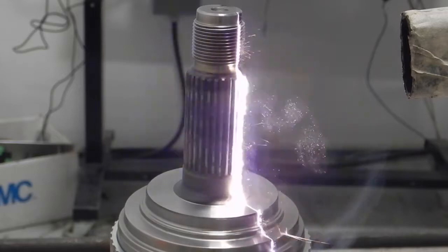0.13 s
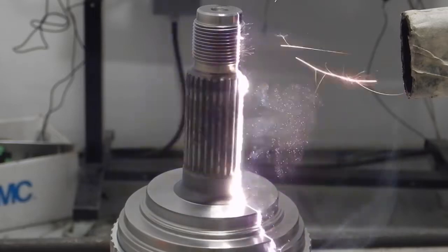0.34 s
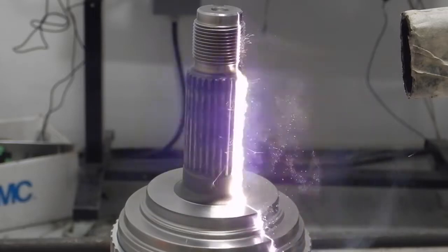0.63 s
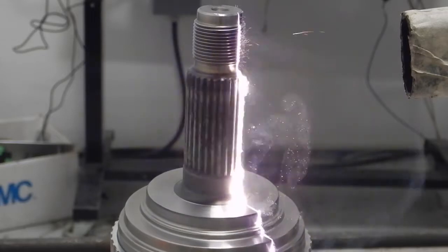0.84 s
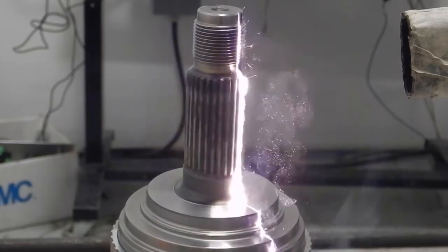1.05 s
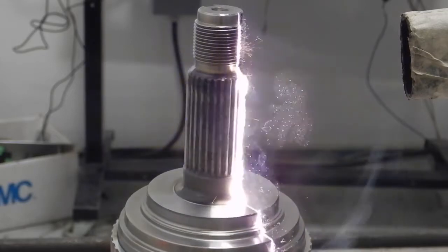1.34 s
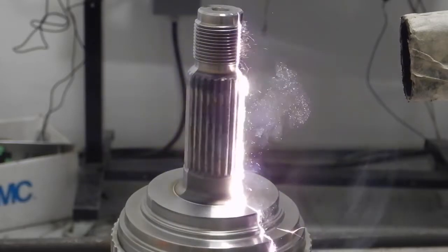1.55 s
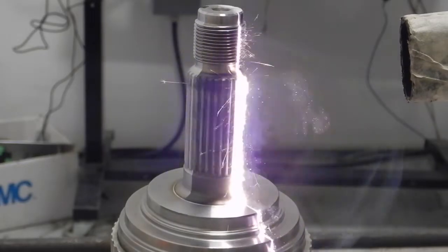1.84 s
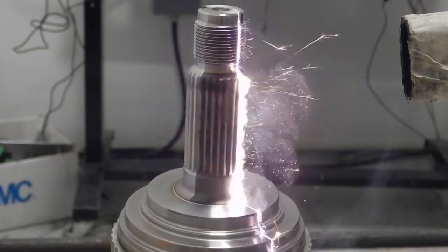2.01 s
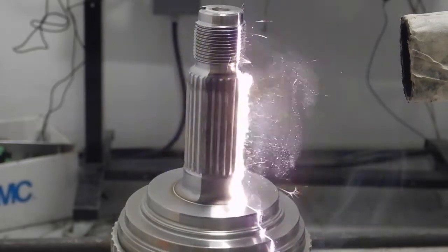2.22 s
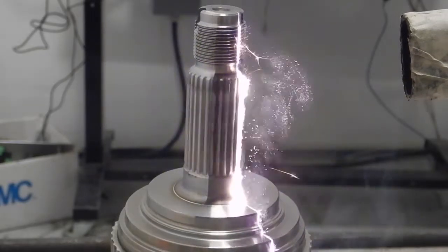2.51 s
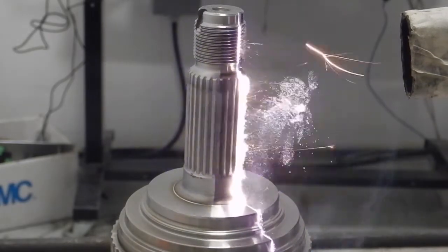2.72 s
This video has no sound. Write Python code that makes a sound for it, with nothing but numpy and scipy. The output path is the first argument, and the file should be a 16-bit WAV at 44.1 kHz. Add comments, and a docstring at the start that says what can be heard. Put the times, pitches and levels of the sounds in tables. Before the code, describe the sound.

A laser scanning a splined steel shaft gives a loud, continuous, harsh buzzing rasp, bright and metallic, with brief spark flares; a low hum pulses about four times a second over extraction rumble and hiss, close in a workshop.

```python
"""A harsh, bright rasp: a laser line scans a splined steel shaft about 160 times a second in a workshop.
Each sweep is a row of clicks at the shoulders of the part over filtered noise that swells on the splines,
with short metallic tones, flaring sparks, a narrow gliding whistle and a noise-tail room. Sines locked to the
sweep make the scanner hum, a buzz on the left that swells, knocks softly and stops four times a second, and a
blip after it. Behind all this an extraction fan rumbles and hisses as coloured noise."""
import sys
import numpy as np
from scipy import signal
from scipy.fft import rfft, irfft, next_fast_len
from scipy.io import wavfile
from scipy.ndimage import uniform_filter1d, map_coordinates

SR = 44100
rng = np.random.default_rng(int(sys.argv[2]) if len(sys.argv) > 2 else 0)


def ratio(d):
    """dB to gain"""
    e = np.asarray(d, float) / 20
    return 10 ** e


def store_wav(level_fs):
    """Save 16-bit WAV to argv[1]."""
    pcm = np.round(np.clip(np.atleast_2d(level_fs), -1, 1) * 32767)
    wavfile.write(sys.argv[1], SR, pcm.T.astype(np.int16))


N = 126126  # length in samples


def level(x, db):
    """Scale to an rms level in dB."""
    return x * ratio(db) / np.sqrt(np.mean(x ** 2))


def colour(x, points):
    """Zero-phase equaliser through (f/Hz, level/dB) points, so pulses stay symmetric."""
    hz, db = np.array(points).T
    size = next_fast_len(N + 4096)
    bins_hz = np.arange(size // 2 + 1) * SR / size
    gain_db = np.interp(np.log(bins_hz + 1), np.log(hz), db)
    return irfft(rfft(x, size) * ratio(gain_db), size)[:N]


def walk(rate):
    """Random levels, rate of them a second, smoothed twice; mean 0, spread 1."""
    hold = int(SR / rate)
    steps = np.repeat(rng.standard_normal(N // hold + 1), hold)
    smooth = uniform_filter1d(uniform_filter1d(steps, hold), hold)[:N]
    return (smooth - smooth.mean()) / smooth.std()


def clicks(at_s, size):
    """Band-limited clicks (windowed sincs) placed between samples."""
    at = at_s * SR
    tap = np.floor(at).astype(int)[:, None] + np.arange(-7, 9)
    off = tap - at[:, None]
    pulse = size[:, None] * np.sinc(off) * np.cos(np.pi * off / 16) ** 2
    inside = (tap >= 0) & (tap < N)
    out = np.zeros(N)
    np.add.at(out, tap[inside], pulse[inside])
    return out


BUZZ_EVERY_S, BUZZ_END_S = .2421, 0.2502  # repeat time, and one moment at which the buzz stops
BLIP_AFTER_S, BLIP_S = 0.045, 0.014  # delay after the buzz stops, half-width of the bell


def flash(t):
    """Short Gaussian bell soon after each buzz stops."""
    late = (t - BUZZ_END_S - BLIP_AFTER_S + BUZZ_EVERY_S / 2) % BUZZ_EVERY_S - BUZZ_EVERY_S / 2
    return np.exp(-(late / BLIP_S) ** 2)


SWEEP_HZ, SWEEP_START_S = 160.45, -.00342
SWEEP_JITTER_MS, STUMBLE_MS = 0.037, 0.081  # timing scatter always, and extra during a blip
# How late the sweep runs against a steady clock: t/s, lag/ms
SWEEP_DRIFT = [(0.013, 0.12), (0.118, -0.21), (0.162, -0.25), (0.23, -0.67), (0.448, -1.21), (0.51, -1.09),
               (0.56, -0.88), (0.641, -0.86), (0.697, -1.01), (0.803, -1.02), (0.852, -1.38),
               (0.983, -1.35), (1.171, -1.14), (1.27, -1.24), (1.376, -1.0), (1.414, -0.8), (1.47, -0.91),
               (1.564, -0.79), (1.607, -1.04), (1.694, -1.24), (1.738, -1.1), (1.812, -1.29),
               (1.943, -1.11), (1.987, -1.47), (2.062, -1.27), (2.168, -1.26), (2.311, -1.02),
               (2.348, -1.21), (2.411, -1.08), (2.473, -1.28), (2.592, -0.94), (2.66, -1.13),
               (2.741, -0.95), (2.847, -1.12)]


def sweeps(t):
    """Running count of sweeps: a steady rate with slow drift and random jitter."""
    s, ms = np.array(SWEEP_DRIFT).T
    spread = SWEEP_JITTER_MS + STUMBLE_MS * flash(t)
    lag_s = (np.interp(t, s, ms) + spread * walk(110)) / 1000
    return (t - SWEEP_START_S - lag_s) * SWEEP_HZ


FAN_DB, FAN_LEFT_DB = -39, 3  # rms before panning; left over right
FAN_APART = 0.19  # gain of the rumble that is opposite in the two channels
AIR_DB, AIR_LEFT_DB = -36, 3
# Tone of the fan rumble: f/Hz, level/dB
FAN_COLOUR = [(25, -27), (80, -13.5), (120, -7), (165, -1.5), (210, 0.5), (260, -3.5), (330, -4.5),
              (400, -17), (550, -20.5), (800, -17), (1000, -17), (2000, -30)]
# Tone of the air hiss: f/Hz, level/dB
AIR_COLOUR = [(20, 0), (60, -3.5), (400, 0), (600, -2.5), (1000, -2.5), (1300, -3.5), (2000, -6),
              (3500, -14.5), (5400, 4), (7600, -31), (10000, -6), (12800, 3.5), (14000, -2), (14500, -50)]


def extraction():
    """Fan rumble, mostly alike left and right, and separate air noise per side with shared gusts."""
    side = np.array([[1], [-1]])
    mid, apart = (colour(rng.standard_normal(N) * ratio(0.98 * walk(8.87)), FAN_COLOUR) for _ in range(2))
    rumble = level(mid + FAN_APART * side * apart, FAN_DB)
    gust_db = 2.5 * walk(9.05)
    air = np.array([colour(rng.standard_normal(N) * ratio(gust_db + 2.0 * walk(14)), AIR_COLOUR)
                    for _ in range(2)])
    return rumble * ratio(side * FAN_LEFT_DB / 2) + level(air, AIR_DB) * ratio(side * AIR_LEFT_DB / 2)


# Gain of the extraction's lower middle, which thins out at times: t/s, level/dB
LOWER_MIDDLE = [(0.0, 1.5), (1.03, 1.5), (1.07, -4.5), (1.34, -6), (1.38, -0.5), (2.18, 1), (2.23, -6),
                (2.38, -3), (2.45, -1), (2.52, -5), (2.65, 0), (2.86, -1)]


def thin(x, t):
    """Turn the 380-1080 Hz part up and down."""
    band = signal.butter(3, [380, 1080], "band", fs=SR, output="sos")
    part = signal.sosfiltfilt(band, x)
    return x + part * (ratio(np.interp(t, *np.array(LOWER_MIDDLE).T)) - 1)


ROOM_DB, ROOM_T60_S = -22.5, 0.24


def room(x, t):
    """Diffuse workshop tail: decaying noise after a 4 ms gap, different in each channel."""
    lag = t[:SR // 2]
    tails = rng.standard_normal((2, len(lag))) * ratio(-60 * lag / ROOM_T60_S) * (lag > .004)
    return np.array([signal.fftconvolve(x, level(tail, ROOM_DB) / np.sqrt(len(tail)))[:N] for tail in tails])


# Partials of the scanner hum: multiple of the sweep rate, left level/dB, right level/dB, waver/dB
SCANNER_HUM = [(1.0, -53, -63, 3), (2.0, -41.5, -44, -0.1), (3.0, -56.5, -58.5, 3.5), (4.0, -57, -61.5, 5),
               (5.0, -60, -61, 5)]


def scanner(turn):
    """Hum of sines at multiples of the sweep rate, each wavering in level."""
    hum = 0
    for multiple, left, right, waver_db in SCANNER_HUM:
        gain = np.sqrt(2) * ratio(np.array([[left], [right]]) + waver_db * walk(14))
        hum = hum + gain * np.sin(2 * np.pi * round(multiple) * turn)
    return hum


BLIP_RIGHT_DB = -1  # right against left
# Partials of the blip at full bell: multiple of the sweep rate, level/dB
BLIP_PARTIALS = [(3.0, -47), (4.0, -47), (5.0, -43), (6.0, -48.5), (13.0, -52)]


def blip(t, turn):
    """Upper partials of the sweep flash briefly, nearly in the middle."""
    tone = 0
    for multiple, db in BLIP_PARTIALS:
        gain = np.sqrt(2) * ratio(db + 3.2 * walk(4.87))
        tone = tone + gain * np.cos(2 * np.pi * round(multiple) * turn)
    return tone * flash(t) * ratio(np.array([[0], [BLIP_RIGHT_DB]]))


BUZZ_LENGTH_S, BUZZ_RIGHT_DB = 0.106, -25  # right against left
SURGE_DB, SURGE_S = 12, 0.013  # SURGE_S is both the lead before the stop and the half-width
KNOCK_DB, KNOCK_S = -35, 0.0044  # typical peak, half-width
# Partials of the buzz before its surge: multiple of the sweep rate, level/dB
BUZZ_PARTIALS = [(1.0, -54.5), (2.0, -44), (3.0, -60), (4.0, -53), (5.0, -63)]


def buzz(t, turn):
    """Gated sweep partials that set in, surge with a low knock (one smooth pulse) and stop."""
    # negative before the stop, positive after it
    past_end = (t - BUZZ_END_S + BUZZ_EVERY_S * .75) % BUZZ_EVERY_S - BUZZ_EVERY_S * .75
    gate = (np.tanh((past_end + BUZZ_LENGTH_S) / 0.0036) - np.tanh(past_end / 0.0037)) / 2
    surge = np.exp(-((past_end + SURGE_S) / SURGE_S) ** 2)
    tone = 0
    for multiple, db in BUZZ_PARTIALS:
        gain = np.sqrt(2) * ratio(db + 1.8 * walk(39.95))
        tone = tone + gain * np.sin(2 * np.pi * round(multiple) * turn)
    knock = -ratio(KNOCK_DB + 1.5 * walk(3.8)) * np.exp(-((past_end + SURGE_S) / KNOCK_S) ** 2)
    return (tone * gate * ratio(SURGE_DB * surge) + knock) * ratio(np.array([[0], [BUZZ_RIGHT_DB]]))


SPLINE_EDGE_MS = 0.076  # softness of each edge
# Stretches of a sweep on the splines: from t/ms, to t/ms, extra level/dB
SPLINE_STRETCHES = [(.75, 2.3, 4), (3.4, 4.55, 6.5)]


def splines(turn):
    """Extra dB while the beam is on the splines."""
    ms = turn % 1 * 1000 / SWEEP_HZ
    return sum(db / 2 * (np.tanh((ms - start) / SPLINE_EDGE_MS) - np.tanh((ms - end) / SPLINE_EDGE_MS))
               for start, end, db in SPLINE_STRETCHES)


FLARE_DB, FLARE_S = -17.5, 0.013  # offset on the table's levels; delay to the peak and half-width
FLARE_WIDTH = .11  # half-bandwidth as a share of the pitch
FLARE_GATE = 1.36  # how deeply the splines chop the flare, times their dB
# Sparks that flare: onset t/s, level/dB of the burn at its peak then (FLARE_DB is added), f/Hz
SPARKS = [(0.28, -16, 3330), (0.372, -17, 3400), (0.6194, -15, 3740), (0.765, -17, 3800),
          (1.005, -17, 3620), (1.2491, -11, 4000), (1.492, -16, 4440), (1.9674, -10.5, 4570),
          (2.2094, -12, 4600), (2.4594, -13, 4650), (2.5494, -13.5, 3600), (2.705, -15, 4600)]


def flares(t, turn):
    """Sparks: short bells of band-passed noise around one pitch, loudest on the splines."""
    out = 0
    for s, db, hz in SPARKS:
        band = signal.butter(2, [hz * (1 - FLARE_WIDTH), hz * (1 + FLARE_WIDTH)], "band", fs=SR, output="sos")
        noise = level(signal.sosfilt(band, rng.standard_normal(N)), db + FLARE_DB)
        bell = np.exp(-((t - s) / FLARE_S - 1) ** 2)
        out = out + noise * bell * ratio(FLARE_GATE * splines(turn))
    return out


# Short decaying tones that colour the clicks and the sizzle: f/Hz, level/dB, t60/s
CLICK_TONES = [(1244, -30, 0.005), (3073, -37, 0.017), (3980, -26, 0.0038), (4650, -29.5, 0.011),
               (6140, -35, 0.0096), (8200, -30.5, 0.0091)]


def metallic(x, t):
    """The sound plus its convolution with short decaying tones, for a metallic colour."""
    lag = t[:SR // 20]
    tones = sum(ratio(db - 60 * lag / t60) * np.cos(2 * np.pi * hz * lag) for hz, db, t60 in CLICK_TONES)
    return x + signal.fftconvolve(x, tones)[:N]


CRACK_JITTER_MS, CRACK_SCATTER_DB, CRACK_DRIFT_DB = 0.018, 1.54, 1.17
# Shoulders crossed in one sweep, up and down again: t/ms, push +1 or pull -1, relative level/dB
SHOULDER_CRACKS = [(.935, -1, -8), (2.01, -1, 1), (2.907, -1, -11), (3.44, 1, -1), (3.54, -1, -2.6),
                   (4.527, -1, -4.5), (5.50, -1, -11.5)]
# Tone of the cracks: f/Hz, level/dB
CRACK_COLOUR = [(700, -51), (980, -30), (1100, -7.5), (1750, -6), (1950, 0), (3000, -3.5), (4600, -2),
                (6100, -1.5), (7000, -9), (9000, -13.5), (13000, -15.5), (14300, -48)]


def cracks(t, turn):
    """A metallic coloured click at each shoulder, a little different on every sweep."""
    count = np.arange(int(turn[-1]) + 1)
    start = np.interp(count, turn, t)
    sample = np.clip(start * SR, 0, N - 1).astype(int)
    when, size = [], []
    for ms, sign, db in SHOULDER_CRACKS:
        jitter_ms = CRACK_JITTER_MS * walk(7.12)[sample]
        scatter_db = CRACK_SCATTER_DB * rng.standard_normal(len(count))
        drift_db = CRACK_DRIFT_DB * walk(9.1)[sample]
        when.append(start + (ms + jitter_ms) / 1000)
        size.append(np.sign(sign) * ratio(db + scatter_db + drift_db))
    pulses = clicks(np.concatenate(when), np.concatenate(size))
    return metallic(colour(pulses, CRACK_COLOUR), t)


# Layers of the surface pattern met again on later sweeps: memory/sweeps, relative level/dB
COATING_LAYERS = [(.2, -6), (1.6, -1.5), (25, -2.5)]


def coating(turn):
    """Random surface read along each sweep; it changes gradually from sweep to sweep."""
    cells, rows = int(SR / SWEEP_HZ), int(turn[-1]) + 101  # the first 100 rows settle the memory
    surface = 0
    for memory, db in COATING_LAYERS:
        keep = np.exp(-1 / memory)
        fresh = rng.standard_normal((rows, cells))
        layer = np.sqrt(1 - keep ** 2) * signal.lfilter([1], [1, -keep], fresh, axis=0)
        surface = surface + ratio(db) * layer
    return map_coordinates(surface[100:].ravel(), [np.clip(turn, 0, None) * cells], mode="mirror")


EVEN_S = 0.055  # window over which the sizzle is evened out
# Tone of the sizzle: f/Hz, level/dB
SIZZLE_COLOUR = [(500, -30), (950, -21.5), (1150, -9.5), (1750, -9), (2000, -3), (3500, -5.5), (4700, -3),
                 (6200, -2.5), (6800, -2), (8200, -8), (9000, -9.5), (13200, -14), (14100, -28),
                 (14500, -60)]


def sizzle(t, turn):
    """Metallic coating noise swelling on the splines, held to an even running level."""
    rough = metallic(colour(coating(turn) * ratio(splines(turn)), SIZZLE_COLOUR), t)
    return rough / np.sqrt(uniform_filter1d(rough ** 2, int(EVEN_S * SR)))


WHISTLE_WIDTH_HZ = 127  # bandwidth of each of two cascaded poles
# Narrow whistling band in the rasp: t/s, f/Hz, level/dB
WHISTLE_PATH = [(0.0, 2065, -37.5), (0.45, 2080, -45), (0.55, 2070, -40), (0.82, 2090, -45),
                (1.15, 2060, -47), (1.27, 2090, -39), (1.36, 2260, -48), (1.55, 2280, -40),
                (1.8, 2250, -39), (2.25, 2245, -42), (2.36, 2200, -48), (2.46, 2070, -40),
                (2.56, 2130, -51), (2.86, 2050, -43)]


def whistle(x, t):
    """A narrow band of the rasp gliding slowly around 2.1-2.3 kHz, evened, its level set by the table."""
    s, hz, db = np.array(WHISTLE_PATH).T
    # shift the band to zero, low-pass, shift back
    spin = np.exp(2j * np.pi * np.cumsum(np.interp(t, s, hz)) / SR)
    keep = np.exp(-np.pi * WHISTLE_WIDTH_HZ / SR)
    two_poles = np.convolve([1, -keep], [1, -keep])
    band = (spin * signal.lfilter([1], two_poles, x / spin)).real
    band = band / np.sqrt(uniform_filter1d(band ** 2, SR // 5))  # even out over 0.2 s
    return band * ratio(np.interp(t, s, db))


CRACK_DB, SIZZLE_DB = -25, -26  # rms before the bands move
# Movement of the burn in three bands; each column counts relative to its own mean:
# t/s, level/dB below 3000 Hz, level/dB of 3000-7800 Hz, level/dB above 7800 Hz
BURN_BANDS = [(0.0, -34, -24, -36), (0.04, -30.5, -23, -32), (0.09, -31, -22.5, -36),
              (0.23, -32.5, -24, -31), (0.27, -30, -22.5, -33.5), (0.46, -32, -24.5, -32),
              (0.5, -33.5, -24, -37), (0.52, -32, -23, -30.5), (0.6, -29, -23, -37.5),
              (0.63, -29, -23, -28), (0.72, -31, -23.5, -34), (1.16, -31, -23.5, -35),
              (1.4, -31.5, -23, -33), (1.58, -28.5, -25.5, -31.5), (1.71, -32, -23, -36),
              (1.76, -29, -22, -31), (1.84, -30.5, -25.5, -30), (1.88, -28, -22.5, -29),
              (1.92, -34, -24, -36.5), (1.94, -28, -27.5, -36), (1.98, -32, -21.5, -34),
              (2.02, -29, -23.5, -32.5), (2.38, -30.5, -23.5, -35), (2.43, -29, -23.5, -36),
              (2.53, -32.5, -24.5, -38.5), (2.64, -31.5, -23, -33), (2.67, -36.5, -25.5, -36),
              (2.7, -32.5, -24.5, -34.5), (2.85, -30, -23, -34), (2.86, -30.5, -24.5, -25)]


def burn(t, turn):
    """Cracks over sizzle, their three bands moving in level, plus the gliding whistle."""
    both = level(cracks(t, turn), CRACK_DB) + level(sizzle(t, turn), SIZZLE_DB)
    low, below_treble = (signal.sosfiltfilt(signal.butter(4, hz, fs=SR, output="sos"), both)
                         for hz in (3000, 7800))
    bands = low, below_treble - low, both - below_treble
    s, *columns = np.array(BURN_BANDS).T
    moving = sum(band * ratio(np.interp(t, s, db - db.mean())) for band, db in zip(bands, columns))
    return moving + whistle(both, t)


def scene():
    """All sources together; only the laser feeds the room tail."""
    t = np.arange(N) / SR
    turn = sweeps(t)
    background = thin(extraction(), t)
    machine = scanner(turn) + blip(t, turn) + buzz(t, turn)
    laser = burn(t, turn) + flares(t, turn)
    return background + machine + laser + room(laser, t)


def top_cut(x):
    """Nothing passes above the cut-off."""
    return signal.sosfilt(signal.butter(12, 15610, fs=SR, output="sos"), x)


def record(dry):
    """The top is cut steeply at 14.4 kHz by an elliptic low-pass."""
    low_pass = signal.ellip(8, .2, 80, 14400, fs=SR, output="sos")
    mix = signal.sosfilt(low_pass, dry)
    return top_cut(mix)


dry = scene()
out = record(dry)
store_wav(out)
```